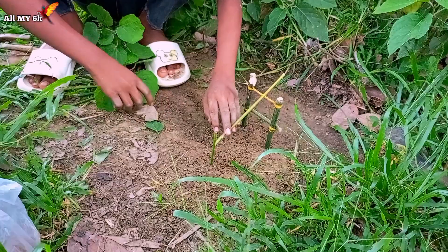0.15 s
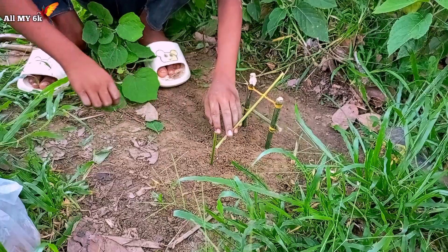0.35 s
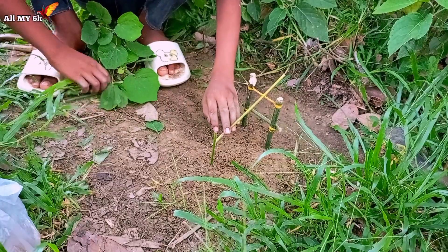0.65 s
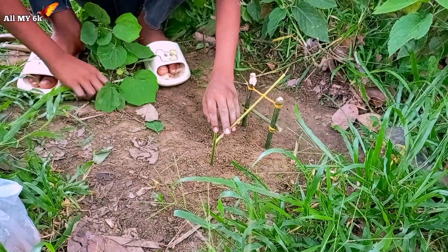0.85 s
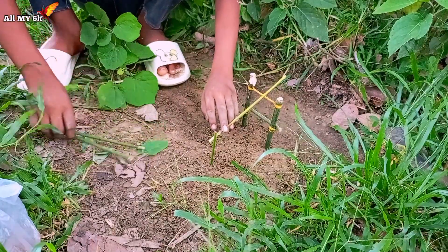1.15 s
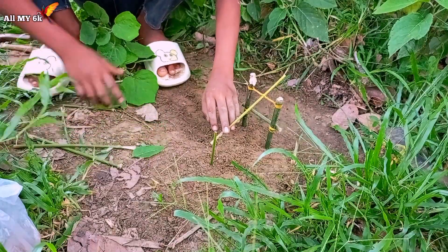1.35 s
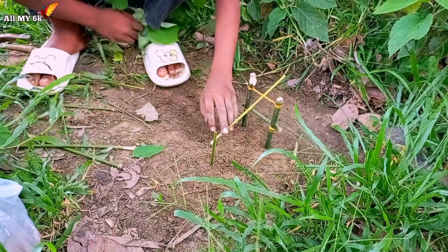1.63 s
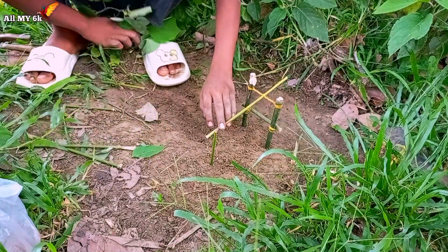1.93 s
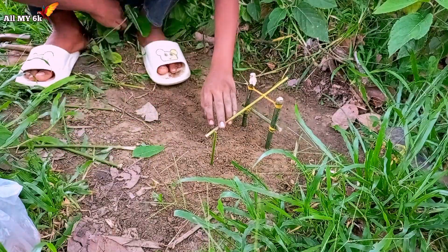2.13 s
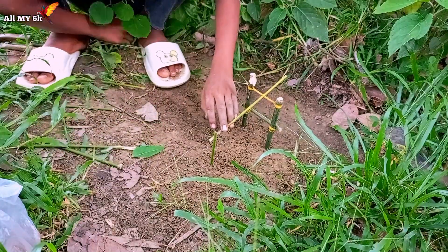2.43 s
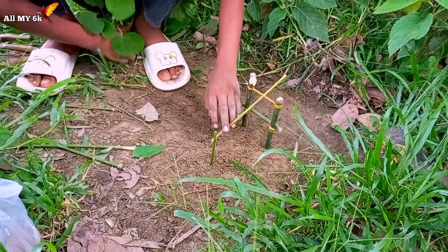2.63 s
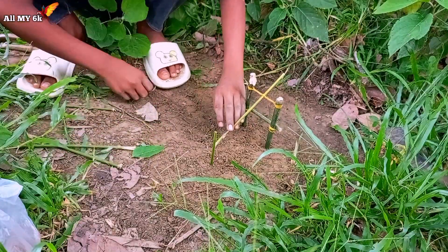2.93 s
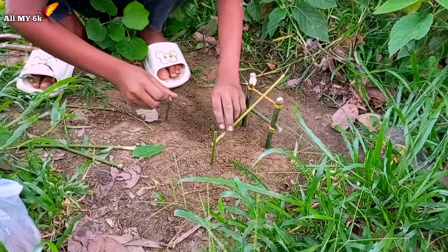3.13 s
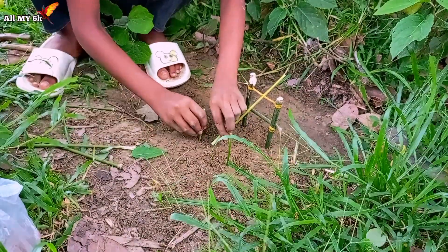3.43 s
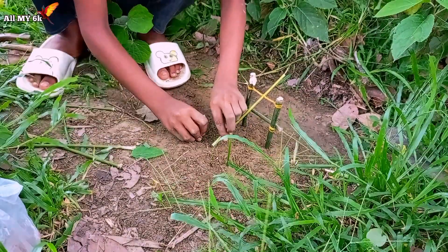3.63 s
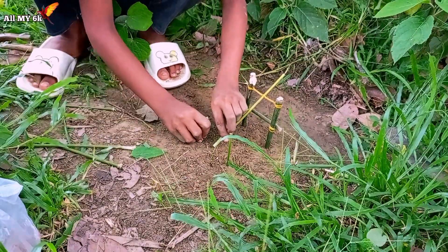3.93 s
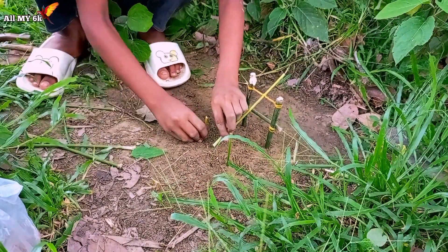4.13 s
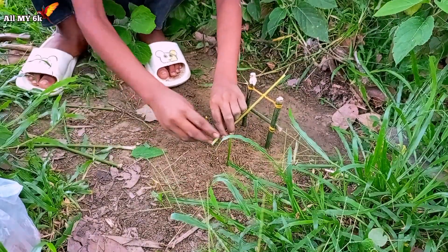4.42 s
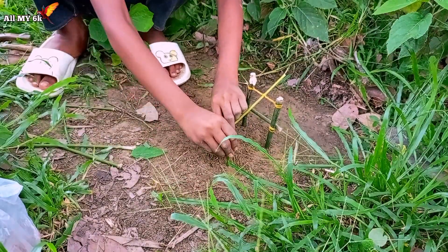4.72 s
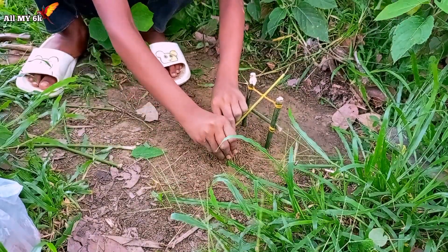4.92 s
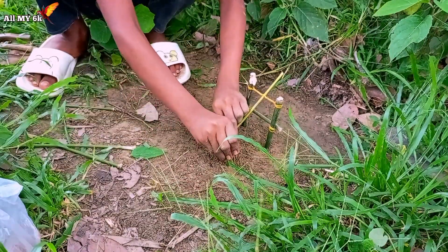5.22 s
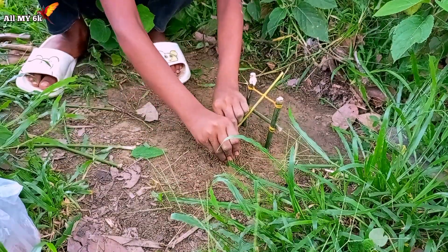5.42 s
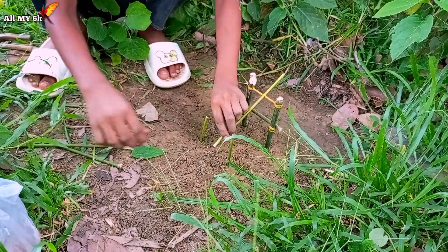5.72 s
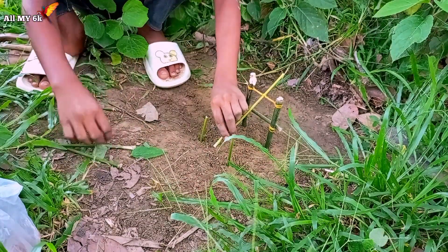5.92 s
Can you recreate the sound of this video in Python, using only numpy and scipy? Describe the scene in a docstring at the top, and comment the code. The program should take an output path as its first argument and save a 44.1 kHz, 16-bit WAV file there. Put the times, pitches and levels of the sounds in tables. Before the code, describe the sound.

A close, dry outdoor scene with a faint low murmur and a soft broad hiss throughout. In the first 0.45 seconds, low bumps nudge the microphone. Faint thin chirps appear now and then, and from 0.6 to 0.95 stems rub with small rough squeaks. A tick at 1.04 precedes a sharp, bright metal clink at 1.34 with tiny bounces. From 1.44 to 1.62 leaves drag in a crackling swish with singing stem tones, ending in a loud snap and brief springing ring. Short stick slides and damped woody knocks follow at 1.85-2.27, strongest near 2.26. At 3.26 the hiss abruptly steps up, brightest around 3.7, then slowly eases. Gritty crumbling comes at 3.55-4.1, 4.5 and 4.85, with dry ticks from 4.54 to 5.25. Higher knocks rattle at 5.55, then a hard juddering scrape bites at 5.66, stopping around 5.73 with a final snap.

```python
"""Sticks and leaves on bare soil

Someone crouches on bare soil among grass, lays a leafy stem aside and pushes thin sticks into the ground.
Damped modes make a metal clink, knocking sticks and a springing stem; shaped noise makes leaves and soil.
Gliding rough tones squeak and chirp, short bursts snap and click, and low pulses bump the microphone.
A low murmur and an outdoor hiss lie under it all; the hiss steps up while the hands work in the soil."""
import sys
import numpy as np
from scipy import signal
from scipy.fft import rfft, irfft, next_fast_len
from scipy.io import wavfile
from scipy.ndimage import uniform_filter1d, map_coordinates

SR = 44100
rng = np.random.default_rng(int(sys.argv[2]) if len(sys.argv) > 2 else 0)


def master_out(mix):
    """Clip the mix to full scale and print it as 16-bit PCM to the path in sys.argv[1]."""
    frames = np.transpose(np.atleast_2d(mix))
    ceiling = np.clip(frames, -1, 1)
    pcm = np.round(ceiling * 32767).astype(np.int16)
    wavfile.write(sys.argv[1], SR, pcm)


N = 267422
TIME = np.arange(N) / SR

# the sweep of the leafy stem, shared by the leaves and their crackle
SWISH_START_S, SWISH_ATTACK_S, SWISH_HOLD_S, SWISH_RELEASE_S = 1.437, 0.058, 0.124, 0.016


def amp(db):
    """Decibels to linear gain."""
    return 10 ** (np.asarray(db) / 20)


def unit(x):
    """x scaled to rms 1."""
    return x / np.sqrt(np.mean(x ** 2) + 1e-20)


def add(track, s, sound):
    """Mix a sound into the track at s seconds, cutting what falls outside."""
    start = round(s * SR)
    part = sound[max(-start, 0):N - start]
    track[max(start, 0):][:len(part)] += part


def wobble(rate):
    """A smooth random curve, rate knots a second."""
    knots = rng.standard_normal(int(N * rate / SR) + 4)
    return map_coordinates(knots, [TIME * rate])


def filtered(x, response):
    """x filtered by a response given as a function of frequency in Hz."""
    size = next_fast_len(len(x) + 8192)  # padding keeps the tail from wrapping round
    spectrum = rfft(x, size) * response(np.fft.rfftfreq(size, 1 / SR))
    return irfft(spectrum, size)[:len(x)]


def gain(points, hz):
    """Gain at hz of a spectrum's points, joined on a log frequency axis."""
    point_hz, point_db = np.transpose(points)
    return amp(np.interp(np.log(hz + 1), np.log(point_hz), point_db))


def coloured(x, points):
    """x shaped by a spectrum, at rms 1."""
    return unit(filtered(x, lambda hz: gain(points, hz)))


def grit(rate, share):
    """Tiny slips of random size, rate a second, over smooth friction noise; share is the slips' power."""
    slips = (rng.random(N) < rate / SR) * rng.standard_normal(N)
    share = np.clip(share, 0, 1)
    smooth = rng.standard_normal(N)
    return np.sqrt(share) * unit(slips) + np.sqrt(1 - share) * smooth


def swell(length):
    """Gain of a smooth rise and fall, length seconds long."""
    return np.sin(np.linspace(0, np.pi, max(round(length * SR), 2)))


def swells(rows):
    """Gain of a series of (time [s], length [s], level [dB]) swells."""
    out = np.zeros(N)
    for s, length, db in rows:
        add(out, s, amp(db) * swell(length))
    return out


def stroke(start, attack, hold, release):
    """Gain of one stroke: it builds up, holds and dies away exponentially."""
    t = TIME - start
    build_up = np.clip(t / attack, 0, 1) ** 2
    return build_up * np.exp(-np.maximum(t - attack - hold, 0) / release)


def chatter(rate, depth_db):
    """Stick and slip: the gain jumps at each uneven slip, about rate a second, and sinks until the next."""
    slips = np.cumsum(rng.uniform(0.5, 1.5, 4000)) / rate
    phase = np.interp(TIME, slips, np.arange(len(slips))) % 1
    return unit(uniform_filter1d(amp(-depth_db * phase), size=24))


def patchy(x, depth_db):
    """Contact shifts from spot to spot, so resonances come and go within some milliseconds."""
    bins = signal.stft(x, nperseg=256)[2]
    across_bins = uniform_filter1d(rng.standard_normal(bins.shape), size=2, axis=0)
    field = uniform_filter1d(across_bins, size=7, axis=1)
    return unit(signal.istft(bins * amp(depth_db * unit(field)))[1][:N])


def rough_tone(size, start_hz, end_hz, width_hz):
    """A gliding friction tone of rms 1; slipping keeps its strength better than its pitch."""
    phase = 2 * np.pi * np.cumsum(np.linspace(start_hz, end_hz, size)) / SR
    a, b = [filtered(rng.standard_normal(size), lambda hz: 1 / (1 + (2 * hz / width_hz) ** 2))
            for _ in range(2)]
    tone = a * np.cos(phase) + b * np.sin(phase)
    return unit(tone / np.sqrt(np.hypot(a, b)))  # the root evens out the strength


def glides(rows, width_hz):
    """Narrow noisy tones that glide in pitch as they swell and fade."""
    out = np.zeros(N)
    for s, length, start_hz, end_hz, db in rows:
        shape = swell(length)
        add(out, s, amp(db) * shape * rough_tone(len(shape), start_hz, end_hz, width_hz))
    return out


def air():
    """The steady low murmur of open air: even, faint coloured noise."""
    # murmur spectrum: (frequency [Hz], density [dB per Hz])
    air_colour = [(25, -37), (50, -14.5), (90, -1.5), (135, -0.5), (220, -5), (400, -7), (900, -10.5),
                  (3000, -63)]
    return amp(-71.5) * coloured(rng.standard_normal(N), air_colour)


def hiss():
    """A broad, slightly restless hiss with a finer fizz on top; both step up with the work."""
    # spectra of the broad hiss and the fine fizz: (frequency [Hz], density [dB per Hz])
    hiss_colour = [(50, -45), (120, -25.5), (250, -15.5), (560, -10.5), (760, -8), (1180, -8), (1340, 2.5),
                   (1700, 2), (2750, 0), (3300, -6.5), (4000, -11.5), (4900, -20), (7500, -24.5),
                   (11000, -40.5)]
    fizz_colour = [(3000, -15.5), (3700, 2), (5000, -15), (5700, -2.5), (7400, -14), (7800, -3),
                   (9000, 5.5), (10300, -4), (10900, -15), (13800, -23), (14800, -4), (15700, -4),
                   (16100, -36)]
    # soft dry brushing in the treble: (time [s], length [s], level [dB])
    brushes = [(-.1, 0.24, -64.5), (1.72, 0.092, -75), (2.55, 0.32, -78), (3.56, 0.08, -61),
               (3.9, 0.21, -59), (5.44, 0.23, -61.5), (5.534, 0.0093, -58), (5.648, 0.027, -51),
               (5.7, 0.23, -66)]
    # both hands start on the soil
    work_start_s, work_rise_s = 3.255, 0.022
    hiss_rest_db, hiss_work_db, hiss_follows_fizz = -52.5, -45.5, 0.3
    # during the work the fizz crests and falls away on both sides
    fizz_rest_db, fizz_crest_db, fizz_crest_s = -74, -59.5, 3.7
    fizz_rise_db_per_s, fizz_fall_db_per_s = 8.5, 3.5

    work = np.clip((TIME - work_start_s) / work_rise_s, 0, 1)
    before_crest_db = fizz_rise_db_per_s * (fizz_crest_s - TIME)
    after_crest_db = fizz_fall_db_per_s * (TIME - fizz_crest_s)
    off_crest_db = np.maximum(before_crest_db, after_crest_db)
    # the hiss follows a share of the fizz's rise and fall
    hiss_db = (1 - work) * hiss_rest_db + work * (hiss_work_db - hiss_follows_fizz * off_crest_db)
    fizz_db = (1 - work) * fizz_rest_db + work * (fizz_crest_db - off_crest_db)

    broad = amp(hiss_db + 0.84 * wobble(25)) * coloured(grit(rate=2500, share=0.19), hiss_colour)
    # brushing shares the fizz's noise; their powers add
    fine_gain = np.hypot(amp(fizz_db + 0.33 * wobble(12)), swells(brushes))
    fine = fine_gain * coloured(grit(rate=3000, share=0.48), fizz_colour)
    return broad + fine


def bumps():
    """Bumps on the microphone: soft low pushes, a cycle or a few long, under a bell-shaped envelope."""
    # pushes: (time of the peak [s], peak level [dB], frequency [Hz], bell's standard deviation [s])
    pushes = [(0.023, -57, 65, 0.01), (0.114, -59, 72, 0.029), (0.268, -38, 78, 0.0075),
              (0.326, -43, 84, 0.0038), (0.352, -54, 77.4, 0.028), (0.422, -55, 69, 0.011),
              (5.788, -55, 80, 0.0054)]
    out, t = np.zeros(N), np.arange(-SR // 8, SR // 8) / SR
    for s, db, hz, half in pushes:
        bell = np.exp(-0.5 * (t / half) ** 2)
        add(out, s + t[0], amp(db) * bell * np.cos(2 * np.pi * hz * t))
    return out


def chirps():
    """Faint thin chirps, perhaps far birds: narrow gliding tones."""
    # chirps: (time [s], length [s], start [Hz], end [Hz], level [dB])
    chirp_rows = [(0.266, 0.13, 3780, 3610, -58.5), (.572, 0.082, 4040, 3960, -51),
                  (1.03, 0.037, 7140, 7160, -67), (2.17, 0.063, 4090, 3940, -53),
                  (2.366, 0.087, 2690, 3120, -53.5), (5.055, .05, 6000, 5950, -63)]
    return glides(chirp_rows, width_hz=110)


def sand():
    """Sand grains click very high, each a thin noise burst a few milliseconds long."""
    # clicks: (time [s], peak level [dB])
    grains = [(0.204, -47.5), (3.265, -54), (5.144, -48), (5.659, -37)]
    # click spectrum: (frequency [Hz], density [dB per Hz])
    sand_colour = [(5000, -37), (8500, 2), (10500, 1), (12500, -17), (15500, -9)]
    out, t = np.zeros(N), np.arange(SR // 30) / SR
    for s, db in grains:
        burst = amp(-60 * t / 0.018) * coloured(rng.standard_normal(len(t)), sand_colour)
        add(out, s, amp(db) * burst / np.abs(burst).max())
    return out


def ticks():
    """Dry twigs and grit snap: an impulse with some milliseconds of splintering and its own treble cut."""
    # snaps: (time [s], peak level [dB], treble cut-off [Hz], splintering over the raw impulse [dB])
    snaps = [(1.042, -33, 2000, -26), (1.607, -17, 8000, -22.5), (1.6083, -29, 6000, -12),
             (4.5405, -35.5, 2500, -22), (4.8447, -27, 3500, -19), (5.2449, -33, 2500, -16),
             (5.659, -27, 5000, -15), (5.665, -25, 2000, -20), (5.676, -31, 2000, -19),
             (5.7312, -29.5, 1800, -18)]
    # snap spectrum: (frequency [Hz], density [dB per Hz])
    tick_colour = [(250, -39), (800, -8), (2000, 9), (4000, 0.5), (5500, -8.5), (9000, -4), (13000, -30),
                   (16000, -19)]
    out, t = np.zeros(N), np.arange(-SR // 200, SR // 40) / SR
    for s, db, cut_hz, splinter_db in snaps:
        decay = (t > 0) * amp(splinter_db - 60 * np.abs(t) / 0.015)
        splinters = decay * rng.standard_normal(len(t))
        impulse = t == 0
        snap = filtered(impulse + splinters, lambda hz: gain(tick_colour, hz) / (1 + (hz / cut_hz) ** 2))
        add(out, s + t[0], amp(db) * snap / np.abs(snap).max())
    return out


def squeaks():
    """Stems rub and squeak: wide gliding tones, roughened by stick and slip."""
    # squeaks: (time [s], length [s], start [Hz], end [Hz], level [dB])
    squeak_rows = [(0.607, 0.066, 3670, 2300, -51), (0.7, 0.06, 1480, 1760, -51.5),
                   (0.776, 0.054, 2200, 2780, -45.5), (0.813, 0.02, 2680, 2850, -42.5),
                   (0.826, 0.074, 2600, 2950, -44), (0.836, 0.035, 1890, 1870, -40),
                   (.852, 0.017, 2718, 2830, -40), (.866, 0.023, 1800, 1820, -47),
                   (0.929, 0.05, 2750, 2480, -48.5), (0.932, 0.046, 1550, 1950, -51.5),
                   (1.905, 0.065, 2080, 2230, -49.5), (2.314, .018, 1060, 1030, -53.5),
                   (3.88, 0.43, 3725, 3590, -56), (5.474, 0.021, 1313, 1320, -42)]
    return chatter(rate=150, depth_db=4) * glides(squeak_rows, width_hz=250)


def slides():
    """A sliding stick sounds all its resonances in one short swell; they glide as the contact moves."""
    # slides: (time [s], length [s], start of main pitch [Hz], end of main pitch [Hz], level [dB])
    slide_rows = [(1.853, 0.06, 1898, 1993, -45), (2.034, 0.0596, 1880, 1640, -52),
                  (2.268, 0.033, 1880, 1620, -44)]
    # resonances of the sliding stick: (multiple of its main pitch [ratio], level [dB])
    slide_ring = [(.28, -20), (.41, -11), (.56, -10), (1, 1), (1.44, -25), (1.92, -16)]
    out = np.zeros(N)
    for s, length, start_hz, end_hz, db in slide_rows:
        shape = swell(length)
        ring = sum(amp(level) * rough_tone(len(shape), k * start_hz, k * end_hz, width_hz=160)
                   for k, level in slide_ring)
        add(out, s, amp(db) * shape * ring)
    return out


def knocks():
    """Each contact rings a green stick's damped modes and leaves a short, dull rub."""
    # sticks knocking and rebounding on each other: (time [s], level [dB], main pitch [Hz],
    # upper mode [Hz], upper mode over the main one [dB], change of the low modes [dB])
    contacts = [(2.0271, -31.5, 1720, 2060, -2, 3), (2.0305, -34.5, 1740, 2060, -3, 0),
                (2.038, -34, 1720, 2020, -5, 1), (2.0435, -36, 1710, 1960, -6, 0),
                (2.053, -37, 1710, 1900, -2, -2), (2.063, -37, 1660, 1900, -14, -3),
                (2.1289, -28.5, 1530, 2150, -20, 0), (2.1365, -29.5, 1480, 2100, -20, 1),
                (2.1505, -33.5, 1620, 2000, -14, 0), (2.255, -21, 1843, 2560, -5.5, -2),
                (2.2609, -20.5, 1825, 2500, -8, 0), (2.2644, -29.5, 1930, 2620, 0, -1),
                (2.2686, -24.5, 1780, 2550, -16, 0), (5.5543, -25, 2270, 2630, -2.5, -15),
                (5.5574, -28, 2300, 2650, -3, -13), (5.5626, -29, 2350, 2720, -6, -13),
                (5.5662, -34, 2410, 2800, -4, -15)]
    # modes of the stick: (multiple of its main pitch [ratio], level [dB], 60 dB decay time [s])
    stick_modes = [(.33, -22.5, 0.045), (0.425, -17, 0.06), (.57, -24, 0.025), (0.93, -12, .035),
                   (1, 0, 0.027), (1.12, -14.5, 0.023)]
    upper_t60_s, attack_s = 0.023, 0.0011
    out, t = np.zeros(N), np.arange(SR // 6) / SR
    for s, db, pitch, upper_hz, upper_db, low_db in contacts:
        # a firm grip mutes the low modes
        modes = [(k, level + low_db * (k < 2 / 3), t60) for k, level, t60 in stick_modes]
        modes.append((upper_hz / pitch, upper_db, upper_t60_s))
        ring = np.zeros(len(t))
        for k, level, t60 in modes:
            decay = amp(level + rng.normal(0, 1) - 60 * t / t60)
            ring += decay * np.sin(2 * np.pi * k * pitch * t)
        noise = rng.standard_normal(len(t))
        rub = unit(filtered(noise, lambda hz: 1 / (1 + ((hz - pitch) / 450) ** 2)))
        attack = 1 - np.exp(-t / attack_s)
        add(out, s, amp(db) * attack * (ring + amp(-28 - 60 * t / 0.054) * rub))
    return out


def clink():
    """A small metal piece strikes with a sharp crack and bounces; its lower modes build up more slowly."""
    # contacts: (time [s], level [dB])
    strikes = [(1.341, -20), (1.3521, -37), (1.3555, -35)]
    # modes of the metal: (frequency [Hz], level [dB], 60 dB decay time [s])
    metal_modes = [(1283, -3.5, 0.12), (2417, -14, 0.072), (3725, -17, 0.1), (4630, -23, 0.06),
                   (5510, -11, 0.028), (5600, -12, .018), (6405, -19, .035), (6500, -12, 0.033),
                   (6976, -0.5, 0.034), (7016, -12, 0.053), (7300, -11, 0.024), (7300, -13, .024),
                   (8773, -17, 0.037), (9230, -13, 0.028), (10100, -13, 0.016), (12100, -23, 0.02),
                   (15300, -23, .022)]
    # the crack of metal on metal: (frequency [Hz], density [dB per Hz])
    crack_colour = [(800, -23), (2800, -4), (4000, -22), (5100, -22), (5550, -1), (6100, -15), (6700, 1),
                    (7500, 4), (7900, -22), (8300, -18), (8900, 1), (10200, 2), (10650, -20), (12100, -6),
                    (13200, -24), (15500, -12)]
    out, t = np.zeros(N), np.arange(SR // 4) / SR
    for s, db in strikes:
        ring = np.zeros(len(t))
        for hz, level, t60 in metal_modes:
            build_up = 1 - np.exp(-t / 0.013 * (hz / 2000) ** 3)
            decay = amp(level + rng.normal(0, 1) - 60 * t / t60)
            ring += decay * build_up * np.sin(2 * np.pi * hz * t)
        crack = amp(-15.5 - 60 * t / 0.03) * coloured(rng.standard_normal(len(t)), crack_colour)
        add(out, s, amp(db) * (ring + crack))
    return out


def stem():
    """The stem sings at shifting pitches as it is dragged, then springs free and rings briefly."""
    # resonances shift as the contact slides: (time [s], length [s], start [Hz], end [Hz], level [dB])
    drag_tones = [(1.478, 0.034, 3780, 3750, -49), (1.478, 0.043, 1620, 1666, -40.5),
                  (1.485, 0.021, 955, 940, -40), (1.495, 0.059, 430, 470, -55.5),
                  (1.506, .018, 3040, 3010, -38), (1.515, 0.054, 700, 750, -48.5),
                  (1.528, .028, 1770, 1740, -45), (1.533, .026, 9140, 9200, -47.5),
                  (1.535, .03, 3080, 3110, -45), (1.55, .04, 3570, 3530, -48),
                  (1.55, .035, 6480, 6530, -50), (1.558, 0.048, 2720, 2700, -44),
                  (1.563, 0.056, 890, 864, -43), (1.596, .034, 770, 730, -47.5)]
    # modes of the freed stem: (frequency [Hz], level [dB], 60 dB decay time [s])
    spring_modes = [(1284, -39.5, 0.086), (2020, -34, 0.049), (2830, -34.5, 0.05), (3960, -30, 0.027)]
    spring_s, attack_s = 1.607, 0.0007
    out, t = glides(drag_tones, width_hz=97), np.arange(SR // 10) / SR
    ring = sum(amp(db - 60 * t / t60) * np.sin(2 * np.pi * hz * t) for hz, db, t60 in spring_modes)
    add(out, spring_s, (1 - np.exp(-t / attack_s)) * ring)
    return out


def crackle():
    """Leaf edges flick one after another: short damped rings, each at its own pitch."""
    flicks_per_s, loudest_db, spread_db = 700, 4, 14  # levels over the rustle
    low_hz, high_hz, decay_s = 1180, 6000, 0.0021
    out, t = np.zeros(N), np.arange(SR // 40) / SR
    span = SWISH_ATTACK_S + SWISH_HOLD_S + 4 * SWISH_RELEASE_S
    for when, height, softness in rng.random((int(flicks_per_s * span), 3)):
        cycles = low_hz * (high_hz / low_hz) ** height * t
        ring = np.sin(2 * np.pi * cycles) * (1 - np.exp(-cycles)) * np.exp(-t / decay_s)
        add(out, SWISH_START_S + when * span, amp(loudest_db - spread_db * softness) * ring)
    return out


def swish():
    """Leaves drag and crackle over the ground in uneven catches, brightest past the middle of the sweep."""
    # rustle spectrum: (frequency [Hz], density [dB per Hz])
    swish_colour = [(200, -55), (420, -22), (580, -22), (800, 2.5), (1150, -2), (1700, 2), (2300, 0.5),
                    (3000, 2), (3600, -7), (6200, -7.5), (7600, -23), (9300, -12.5), (10500, -28),
                    (13500, -35), (15500, -17)]
    # the leaves catch on the ground: (time [s], length [s], level relative to the stroke [dB])
    catches = [(1.458, 0.022, -1), (1.488, 0.016, -3), (1.507, 0.01, -5), (1.545, .009, -10),
               (1.579, 0.0065, -9), (1.6045, .007, -7), (1.613, 0.011, -10)]
    # a softer stir of the leaves around the sweep: (time [s], length [s], level [dB])
    leaf_stir = [(1.43, 0.27, -54.5)]
    sweep_db, dull_db, lift_db = -42.5, -5, 9.5
    bright_s, bright_spread_s = 1.577, 0.042

    sweep = stroke(SWISH_START_S, SWISH_ATTACK_S, SWISH_HOLD_S, SWISH_RELEASE_S) * (1 + swells(catches))
    bright_db = dull_db + lift_db * np.exp(-0.5 * ((TIME - bright_s) / bright_spread_s) ** 2)
    rustle = coloured(grit(rate=1500, share=0.39), swish_colour)
    rustle = patchy(rustle, depth_db=2.5) + crackle()
    # tilt the balance around 3.1 kHz
    low = filtered(rustle, lambda hz: 1 / (1 + (hz / 3100) ** 4))
    leaves = low * amp(-bright_db / 2) + (rustle - low) * amp(bright_db)
    sweep_gain = sweep * amp(sweep_db) * chatter(rate=130, depth_db=2)
    return np.hypot(sweep_gain, swells(leaf_stir)) * leaves


def scrape():
    """A stick drags through the soil: it bites hard, judders, thins out as it slides and stops short."""
    # grating spectrum: (frequency [Hz], density [dB per Hz])
    scrape_colour = [(300, -29), (780, -24), (1040, 2), (1200, -1), (1340, 2), (2000, -2.5), (2900, -9),
                     (3700, -10.5), (4700, -32), (5600, -23), (7000, -42), (9000, -21), (13000, -42)]
    # resonances in the ground; the lowest outlasts the others:
    # (frequency [Hz], width [Hz], level relative to the stroke [dB], extra fade [dB per s])
    scrape_ring = [(1067, 110, -5.5, -10), (1340, 150, 7.5, 400), (1750, 450, -7.5, 0),
                   (3590, 650, -6.5, 80)]
    start_s, attack_s, hold_s, release_s = 5.6565, 0.003, 0.072, 0.002
    level_db, fade_db_per_s = -41.5, 22
    bite_db, bite_s = 6, 0.018

    age = np.maximum(TIME - start_s, 0)
    push = stroke(start_s, attack_s, hold_s, release_s)
    bite = amp(bite_db * np.exp(-(age / bite_s) ** 2))
    friction = coloured(grit(rate=3000, share=0.32), scrape_colour)
    grating = bite * chatter(rate=260, depth_db=8) * friction
    ring = sum(amp(db - fade * age) * rough_tone(N, hz, hz, width) for hz, width, db, fade in scrape_ring)
    return amp(level_db - fade_db_per_s * age) * push * (grating + ring)


def crumbling():
    """Soil crumbles under the fingers: swells of gritty noise."""
    # crumbling: (time [s], length [s], level [dB])
    crumbles = [(0.07, 0.078, -49), (1.704, 0.12, -54), (2.257, 0.041, -48.5), (2.575, 0.053, -50.5),
                (3.553, 0.088, -41.5), (3.625, 0.074, -45.5), (3.692, .04, -43.5), (3.893, .04, -43.5),
                (3.94, 0.066, -47.5), (4.07, .08, -49.5), (4.516, 0.16, -50.5), (4.835, 0.13, -49),
                (5.525, 0.026, -46.5)]
    # crumb spectrum: (frequency [Hz], density [dB per Hz])
    crumble_colour = [(600, -49), (950, 0.5), (1150, -12.5), (1400, 3.5), (2700, 6), (3500, -2.5),
                      (4800, -14), (7400, -19), (9000, -13.5), (12000, -33.5), (15500, -24)]
    return swells(crumbles) * coloured(grit(rate=570, share=0.45), crumble_colour)


def scene():
    """All sources, heard by one close microphone."""
    background = air() + hiss() + bumps() + chirps()
    small_sounds = sand() + ticks() + squeaks()
    sticks_and_metal = slides() + knocks() + clink()
    leaves_and_soil = stem() + swish() + scrape() + crumbling()
    return (background + small_sounds + sticks_and_metal + leaves_and_soil)[None]


def record(dry):
    """A sharp band limit: nothing from 15.9 kHz up is kept."""
    return np.array([filtered(x, lambda hz: hz < 15900) for x in dry])


dry = scene()
out = record(dry)
master_out(out)
```